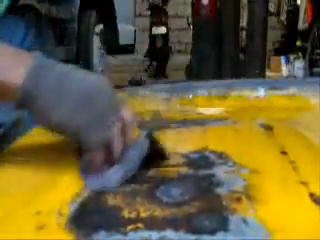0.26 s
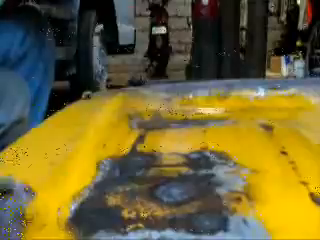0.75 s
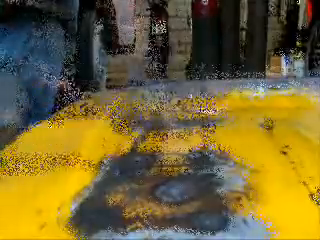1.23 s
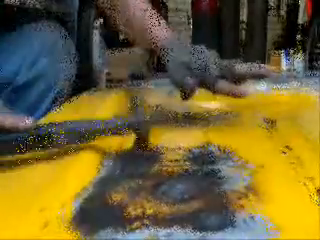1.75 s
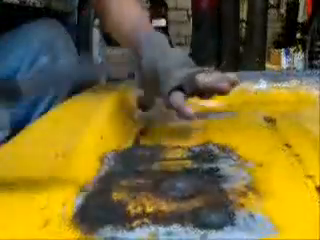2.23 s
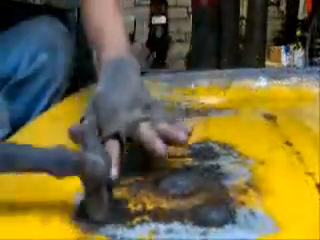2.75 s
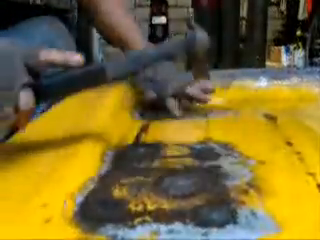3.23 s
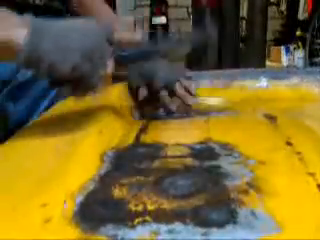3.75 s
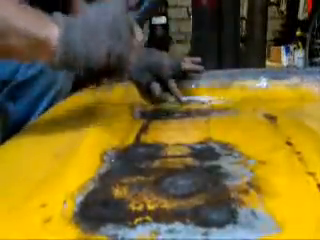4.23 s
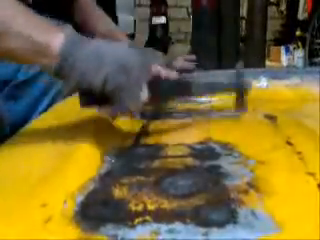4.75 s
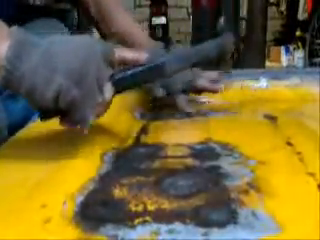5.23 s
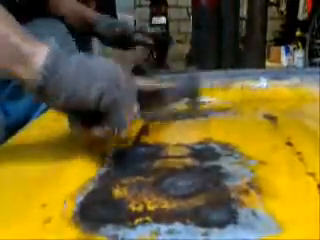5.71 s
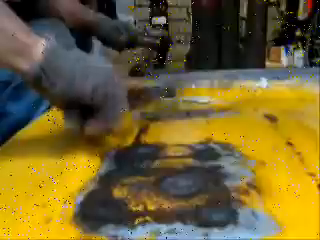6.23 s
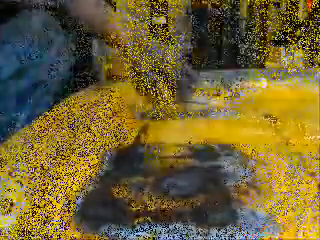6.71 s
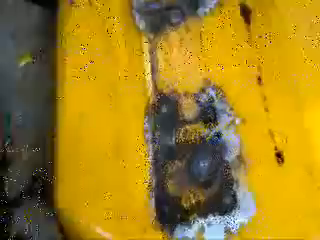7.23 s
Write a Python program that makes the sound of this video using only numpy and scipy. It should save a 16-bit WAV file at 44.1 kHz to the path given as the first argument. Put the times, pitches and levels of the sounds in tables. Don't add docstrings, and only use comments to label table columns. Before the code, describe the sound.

Hard ringing hammer knocks on a hollow metal panel overload a small camera microphone, framed by the breathy roar of a gas torch.

```python
import sys
import numpy as np
from scipy import signal
from scipy.fft import rfft, irfft, next_fast_len
from scipy.io import wavfile
from scipy.ndimage import uniform_filter1d

SR = 44100
rng = np.random.default_rng(int(sys.argv[2]) if len(sys.argv) > 2 else 0)


def int16_out(signal):
    q = np.round(np.clip(np.atleast_2d(signal).T, -1, 1) * 32767)
    wavfile.write(sys.argv[1], SR, q.astype(np.int16))


def to_linear_factor(level_db):
    exponent = np.asarray(level_db, float) / 20
    return 10 ** exponent


N = 329427
T = np.arange(N) / SR


def at(table, hz, column=1):
    rows = np.array(table)
    log_hz = np.log(np.maximum(hz, 1))
    return np.interp(log_hz, np.log(rows[:, 0]), rows[:, column])


def walk(rate_hz):
    held = np.repeat(rng.standard_normal(int(N * rate_hz / SR) + 2), 8)
    slewed = uniform_filter1d(uniform_filter1d(held, size=8), size=8)
    return np.interp(T * rate_hz * 8, np.arange(len(held)), 1.3 * slewed)


def bands():
    size = next_fast_len(N)
    spec = rfft(rng.standard_normal((2, size)))
    centres_hz = 31.25 * 2 ** np.arange(0, 9, .5)
    place = 2 * np.log2(np.arange(1, size // 2 + 2) * SR / size / centres_hz[0])
    for k, hz in enumerate(centres_hz):
        window = np.cos(np.pi / 2 * np.clip(place - k, -1, 1)) ** 2
        yield hz, irfft(spec * window, size)[:, :N]


def spread(pair, correlation):
    power = (1 + np.clip(correlation, -1, 1) * np.array([[1], [-1]])) / 2
    mid, side = pair * np.sqrt(power)
    return np.array([mid + side, mid - side])


def colour(x, table):
    size = next_fast_len(x.shape[1])
    hz = np.arange(size // 2 + 1) * SR / size
    port_db = [at(table, hz, column=c) for c in (1, 2)]
    gain = to_linear_factor(port_db) * np.sqrt(SR / 2)
    return irfft(rfft(x, size) * gain, size)[:, :x.shape[1]]


def ring(x, hz, t60_s):
    r = np.exp(-np.log(1000) / (t60_s * SR))
    turn = 2 * np.pi * hz / SR
    return signal.lfilter([0, r * np.sin(turn)], [1, -2 * r * np.cos(turn), r ** 2], x)


# start in seconds, strength in dB, boom in dB, body drum in dB.
BLOWS = [(0.8888, -26.5, -13, -55), (1.1516, -14, -10, -44), (1.794, -9, -8, -24), (2.1956, -12, -2.5, -20),
         (2.5304, -9.5, -1.5, -26), (2.757, -11.5, -1.5, -30), (3.0041, -5, -9, -19),
         (4.0405, -5.5, -7, -24), (4.3912, -3, -8.5, -21), (4.7101, -5.5, -7, -16), (5.716, -7, -10, -40),
         (6.0308, -9.5, -7, -42), (6.2672, -9.5, -7, -42), (6.6454, -35, -4.5, -60)]
# frequency in Hz, left in dB per Hz, right in dB per Hz.
PANEL_SPECTRUM = [(40, -25, -48.5), (132, -31, -23), (216, -22, -20.5), (400, -25, -26.5),
                  (563, -19.0, -18.5), (820, -32, -30.5), (1080, -26, -31), (1660, -32, -32.5),
                  (2200, -25, -33), (2560, -36, -42), (3280, -35.5, -38), (4870, -46, -45),
                  (6480, -54, -50.5), (9200, -75, -59)]
# frequency in Hz, correlation.
PANEL_LIKENESS = [(60, -0.55), (120, 0.88), (250, 0.9), (520, 0.37), (1070, -0.0067), (2190, -0.43),
                  (4500, 0.56), (9250, 0.059)]
# frequency in Hz, T60 in seconds.
PANEL_DECAY = [(40, 0.1), (110, 0.37), (280, 0.35), (740, 0.27), (1940, 0.12), (5120, 0.2), (9000, 0.12)]
# frequency in Hz, level in dB, T60 in seconds.
PANEL_MODES = [(80.3, -11, 1.72), (134.5, -13.5, 1.2), (174, -6.5, 0.73), (188.4, -9, 0.47),
               (234.5, -7, .45), (302, -17, 1.1), (363, -10.5, 0.57), (394.5, -13, .8), (471, -13.5, .45),
               (537, -8, 0.56), (565, -10.5, 0.44), (640, -8, 0.43), (699, -7, 0.18), (761, -14, 0.21),
               (910, -18.5, .35), (1028, -11.5, 0.36), (1170, -26.5, .35), (1320, -24.5, 0.36)]


def hammer(noise):
    s, strength_db, boom_db, drum_db = np.transpose(BLOWS)
    start, length = (s * SR).astype(int), int(.6 * SR)
    age, flat = T[:length], np.zeros((2, N))
    room = to_linear_factor(-24 - 60 * age / 0.96)
    decay_stretch = 1.2
    for hz, pair in noise[2:]:
        wash = spread(pair[:, ::-1], at(PANEL_LIKENESS, hz))
        boom_share = np.clip(np.log2(1200 / hz), 0, 1)
        build = 1 - np.exp(-age / (0.00051 + 2.2 / hz))
        plate = np.exp(-np.log(1000) * age / (decay_stretch * at(PANEL_DECAY, hz)))
        fall = build * (plate + room)
        for i, size_db in zip(start, strength_db + boom_share * (boom_db - 1.5)):
            flat[:, i:i + length] += fall[:N - i] * wash[:, i:i + length] * to_linear_factor(size_db + 5)

    scatter_db = 2.5 * rng.standard_normal((len(s), len(PANEL_MODES)))
    lines = 0
    for (hz, mode_db, t60_s), spot_db in zip(PANEL_MODES, scatter_db.T):
        kick = np.zeros(N)
        blow_db = drum_db if hz < 100 else strength_db + boom_db + spot_db
        kick[start] = to_linear_factor(mode_db + blow_db)
        lines = -lines + ring(kick, hz, t60_s)

    kick = np.zeros(N)
    kick[start[[11, 12]]] = to_linear_factor(-22)
    head = ring(kick, 8650, .04) * np.array([[.3], [1]])
    return colour(flat, PANEL_SPECTRUM) + to_linear_factor(5) * lines + head


# start in seconds, length in seconds, signed settling thump,
# share of full scale.
WRAP_LEFT = [
    (1.153, .087, .6, .38),
    (1.796, .026, .7, .62),
    (2.197, .063, .85, .95),
    (2.531, .037, -.55, .9),
    (2.759, .060, -.5, .9),
    (3.006, .064, -.6, .95),
    (4.042, .051, -.4, .95),
    (4.392, .040, -.3, .95),
    (4.711, .045, -.6, .95),
]
WRAP_RIGHT = [
    (4.718, .026, -.9, 1.05),
]


def unlock(x, wraps, first_hz):
    slowest_hz, slows_per_s, rail, thump_t60_s = 70, 44, 1.6, .14
    out = x.copy()
    wobble_db = 3 * walk(170) + 2.2 * walk(900)
    for s, length_s, thump, full in wraps:
        a, b = int(s * SR), int((s + length_s) * SR)
        part = np.linspace(0, 1, b - a)
        slowing_hz = first_hz * np.exp(-slows_per_s * length_s * part ** 1.1)
        hz = (slowest_hz + slowing_hz) * to_linear_factor(wobble_db[a:b])
        turns_left = np.cumsum(hz[::-1])[::-1] / SR
        shake = (.9 + .7 * (1 - part) ** 2) * (x[a:b] - x[b]) / full
        swing = np.cos(2 * np.pi * turns_left + shake) * np.sign(thump)
        rails = signal.lfilter([.36], [1, -.69], np.tanh(1.9 * swing))
        out[a:b] = rail * full * uniform_filter1d(rails, size=2) + .28 * x[a:b]
        age = T[:SR // 4]
        settling = np.cos(2 * np.pi * 33 * age ** .97) * to_linear_factor(-60 * age / thump_t60_s)
        out[b:b + len(age)] += rail * full * thump * settling
    return out


def ducking():
    over_db, most_db, hold_s, recover_db_per_s = -17, 9.5, .3, 22
    s, strength_db = np.transpose(BLOWS)[:2, :, None]
    depth = np.clip(strength_db - over_db, 0, most_db) * (T >= s)
    left_db = np.clip(depth - recover_db_per_s * (T - s - hold_s), 0, depth)
    return -left_db.max(axis=0)


# time in seconds, hiss in dB.
HISS_NEAR = [
    (0.0, -22),
    (.07, -25.5),
    (.14, -23.5),
    (0.78, -22.5),
    (.93, -25),
    (1.0, -22.5),
    (1.3, -24.5),
    (1.67, -37),
    (1.8, -36.5),
]
HISS_ASIDE = [
    (1.8, -35),
    (3.7, -36),
    (4.0, -34),
    (6.25, -35.5),
    (6.53, -38),
]
HISS_CLOSE = [
    (6.53, -36),
    (6.56, -29.5),
    (7.27, -22.5),
    (7.47, -21.5),
]
# frequency in Hz, left in dB per Hz, right in dB per Hz.
TORCH_NEAR = [(40, -40.5, -32.5), (91, -31, -28.5), (350, -33, -32.0), (593, -26, -22), (803, -39, -35.5),
              (1140, -29.5, -40), (1500, -36.5, -33), (1860, -32, -41.5), (2010, -26.5, -33),
              (2540, -32, -38.5), (3370, -26.5, -25.5), (4200, -28, -31), (5900, -36, -35),
              (9230, -51, -46)]
TORCH_ASIDE = [(40, -30.5, -27.5), (90, -25.5, -28), (350, -41.5, -36), (594, -32, -27), (845, -42, -43),
               (1150, -34.5, -45), (1500, -38.0, -34), (1780, -36, -42), (2090, -29, -42.5),
               (2540, -37.0, -41), (3290, -31, -30.5), (4100, -28, -30.5), (6380, -38.0, -35.5),
               (10260, -55.5, -47.5)]
TORCH_CLOSE = [(40, -27.5, -33), (150, -28, -28.5), (325, -35.5, -33.5), (415, -25.5, -30.0),
               (600, -32, -30), (960, -33.5, -40.5), (1200, -37.5, -38.5), (1700, -37, -39.5),
               (2570, -38, -38.5), (3720, -34, -31), (5300, -35, -36.5), (6130, -33.5, -31),
               (7160, -38.5, -39), (9700, -55, -39)]
# frequency in Hz, correlation.
LIKE_NEAR = [(60, -0.23), (120, 0.91), (250, 0.77), (520, 0.8), (1070, -0.29), (2190, -0.099), (4500, 0.47),
             (9250, 0.21)]
LIKE_CLOSE = [(60, 0.3), (120, 0.51), (250, 0.72), (520, 0.76), (1070, 0.48), (2190, -0.41), (4500, 0.98),
              (9250, 0.63)]


def torch(noise):
    shots = [(HISS_NEAR, TORCH_NEAR, LIKE_NEAR),
             (HISS_ASIDE, TORCH_ASIDE, LIKE_NEAR),
             (HISS_CLOSE, TORCH_CLOSE, LIKE_CLOSE)]
    roar_over_hiss_db = [2.2, 2.2, -1.5]
    roar_follows = [.65, .4, .7]
    flat, out, breathe = np.zeros((2, N)), np.zeros((2, N)), walk(6.8)
    cuts = [slice(int(curve[0][0] * SR), int(curve[-1][0] * SR)) for curve, _, _ in shots]
    levels_db = [np.interp(T[cut], *np.transpose(curve)) for cut, (curve, _, _) in zip(cuts, shots)]
    levels_db[1] = levels_db[1] + ducking()[cuts[1]]
    for hz, pair in noise:
        flutter = to_linear_factor(.8 * breathe + .9 * walk(16))
        roar_share = np.clip(np.log2(1800 / hz), 0, 1)
        for cut, (_, _, like), hiss_db, roar_db, follows in zip(cuts, shots, levels_db,
                                                                roar_over_hiss_db, roar_follows):
            apart_db = (follows - 1) * (hiss_db - hiss_db.mean())
            level = to_linear_factor(hiss_db + roar_share * (roar_db + apart_db))
            flat[:, cut] += spread(pair[:, cut], at(like, hz)) * level * flutter[cut]
    for cut, (_, spectrum, _) in zip(cuts, shots):
        out[:, cut] = colour(flat[:, cut], spectrum)
    return out


def scrape():
    start_s = 7.41
    swell = np.clip((T - start_s) / (T[-1] - start_s), 0, 1)
    return to_linear_factor(-30) * ring(swell * rng.standard_normal(N), hz=1100, t60_s=.008)


def scene():
    noise = list(bands())
    saturates, right_db = 2.1, 1.1
    knocks = hammer(noise) * to_linear_factor([[0], [right_db]])
    left, right = saturates * np.tanh(knocks / saturates)
    blows = [unlock(left, WRAP_LEFT, first_hz=2200), unlock(right, WRAP_RIGHT, first_hz=1000)]
    return np.array(blows) + torch(noise) + scrape()


def grain_and_gaps(x):
    top_hz, keep_db, keep_slope = 10000, -45.5, 0.63
    hz, _, spec = signal.stft(x, SR, nperseg=1536)
    power = np.abs(uniform_filter1d(np.abs(spec) ** 2, size=9, axis=1))
    grain = rng.standard_normal(spec.shape) + 1j * rng.standard_normal(spec.shape)
    spec = spec + to_linear_factor(-15.5) * np.sqrt(power) * grain

    edges = np.searchsorted(hz, np.arange(7200, top_hz, 200))
    band_db = 10 * np.log10(np.add.reduceat(power, edges, axis=1) + 1e-18)
    frame_db = 10 * np.log10(power.sum(axis=1, keepdims=True) + 1e-18)
    chance_db = 7.2 * uniform_filter1d(rng.standard_normal(band_db.shape), size=3)
    margin_db = band_db - keep_db - keep_slope * frame_db - chance_db
    kept = np.clip(margin_db + .5, 0, 1)
    spec[:, edges[0]:] *= np.repeat(kept, np.diff(np.append(edges, len(hz))), axis=1)
    spec[:, hz > top_hz] = 0
    return signal.istft(spec, SR, nperseg=1536)[1][:, :N]


def dropout():
    lost_s, fade_s, gap_s, return_s = 2.877, .033, .036, .022
    s = lost_s + np.cumsum([-.001, .002, fade_s, .004, gap_s, .004, return_s])
    return to_linear_factor(np.interp(T, s, [0, -10, -33, -80, -80, -15, 0]))


def low_pass(x):
    return signal.sosfilt(signal.butter(12, 15700, fs=SR, output="sos"), x)


def record(dry):
    gated = grain_and_gaps(dry) * dropout() * to_linear_factor(-6)
    clipped = np.clip(1.1 * gated, -1, 1)
    return low_pass(clipped)


dry = scene()
out = record(dry)
int16_out(out)
```